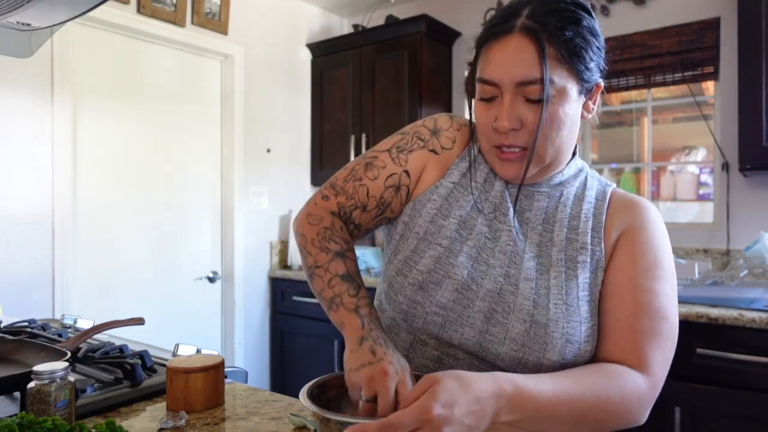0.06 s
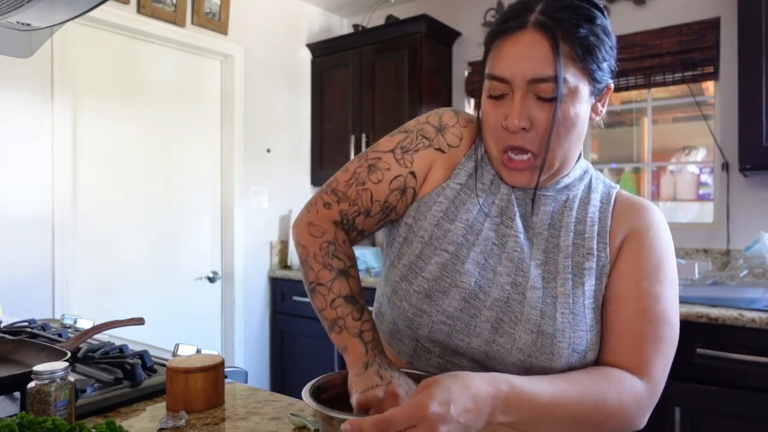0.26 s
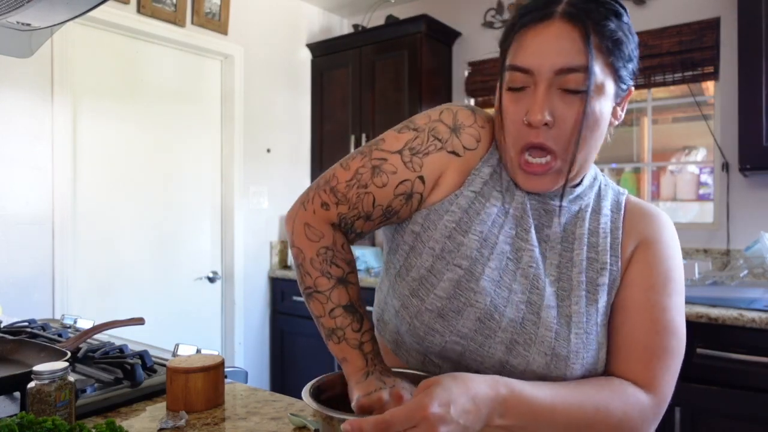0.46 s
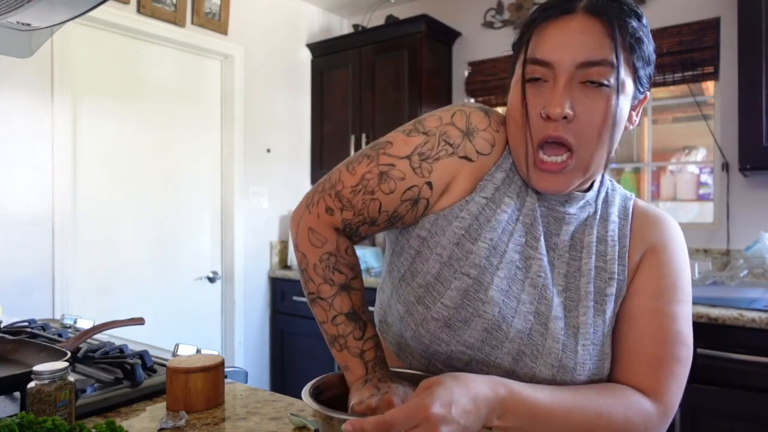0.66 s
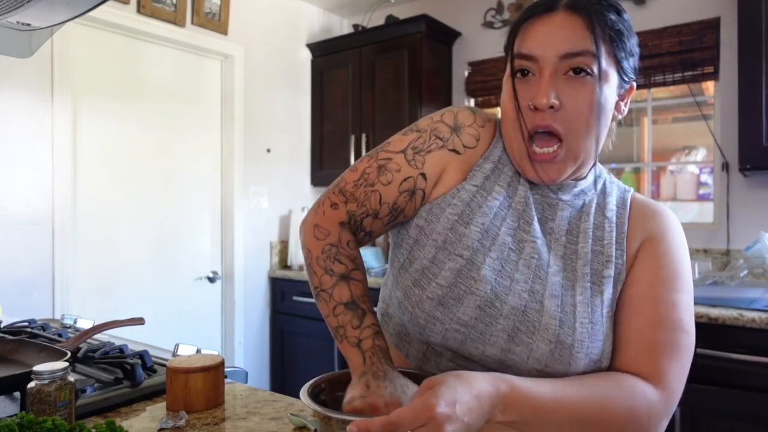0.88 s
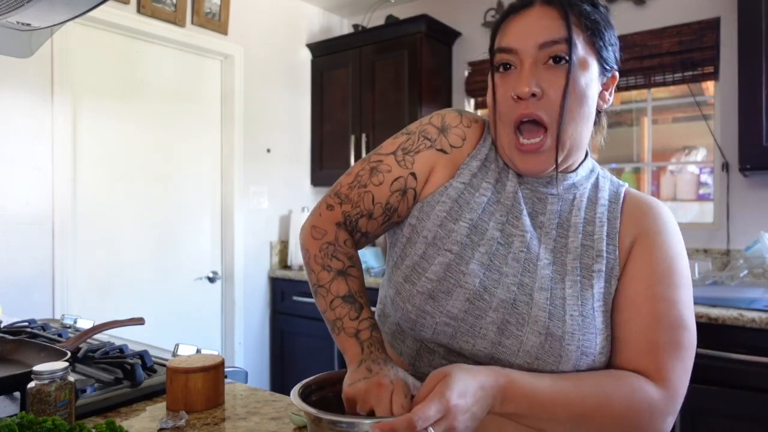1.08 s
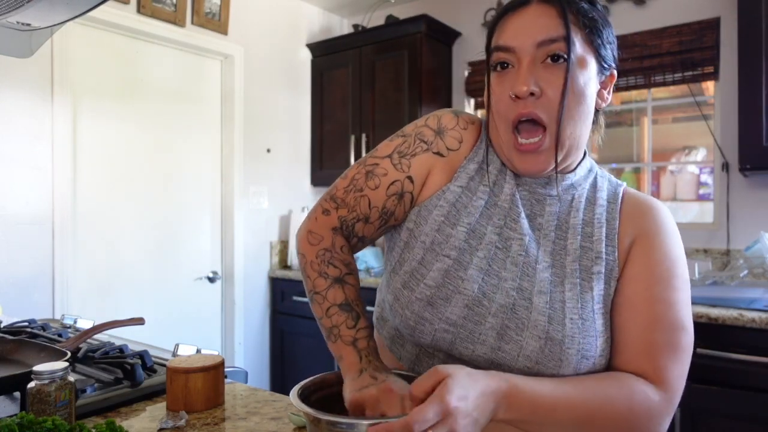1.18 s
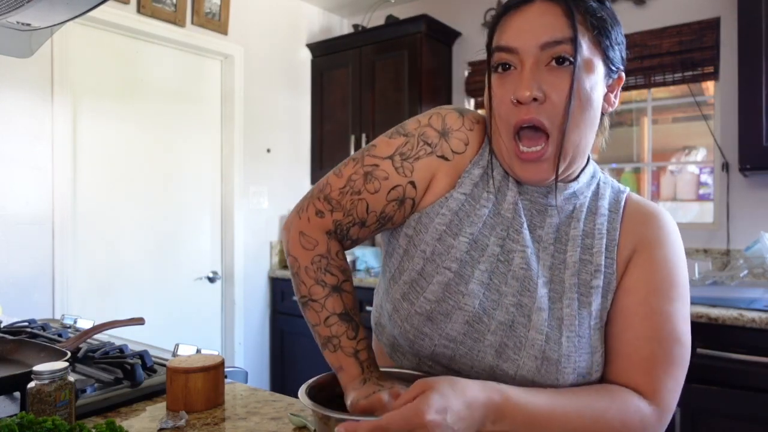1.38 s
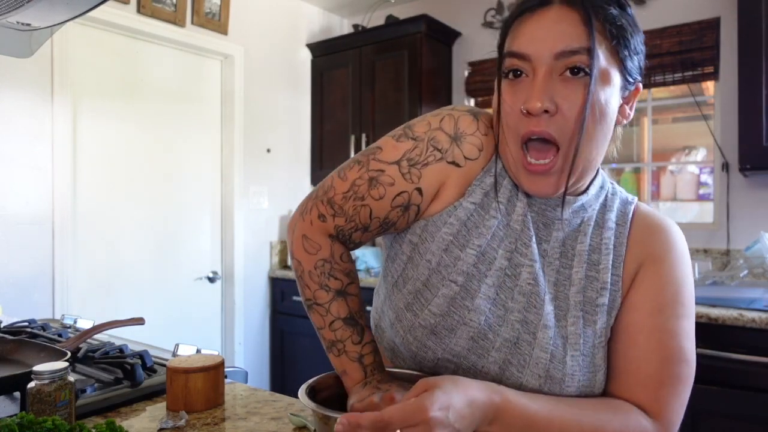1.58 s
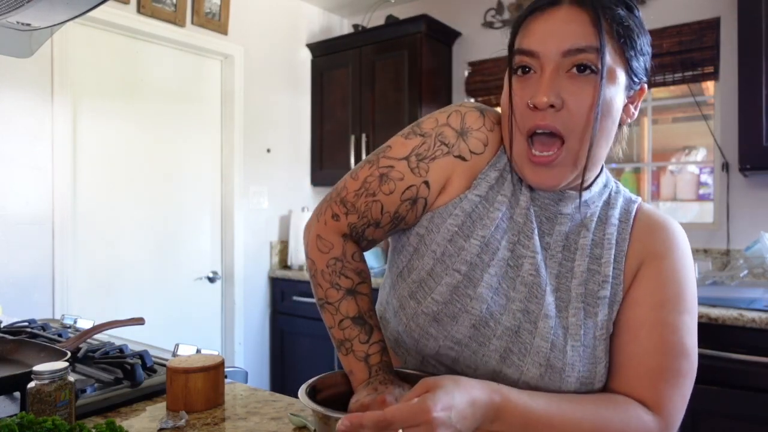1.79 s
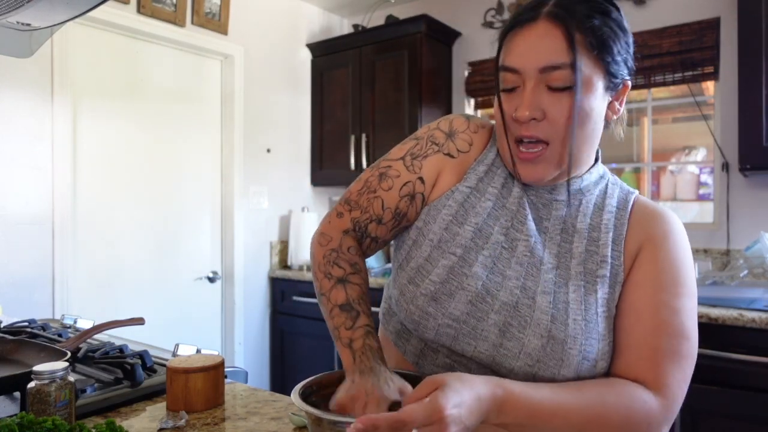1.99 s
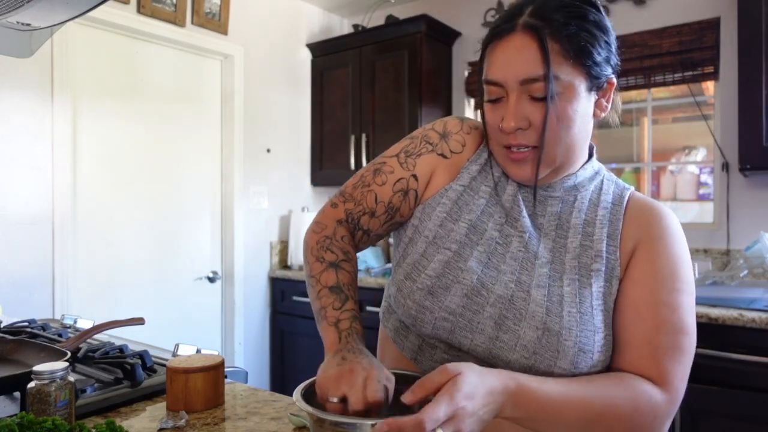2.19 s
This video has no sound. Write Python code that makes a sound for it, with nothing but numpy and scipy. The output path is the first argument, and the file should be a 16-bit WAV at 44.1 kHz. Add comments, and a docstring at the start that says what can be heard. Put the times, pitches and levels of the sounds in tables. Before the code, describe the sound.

Crushing peppercorns with a glass in a steel bowl: a knock and gritty crunch, a dense flurry of sharp cracks, a second duller ringing knock, then one loud crack, close microphone in a lively kitchen.

```python
"""Faint room air comes first, then a glass knocks on a steel bowl on a kitchen counter and crumbs grate.
The glass is pressed and rocked on peppercorns: seeds burst with sharp cracks, made of scattered, resonant clicks.
Knocks are damped sines, the bowl rings in sums of dying modes, and grating is a shower of random tiny clicks.
Filtered noise gives the counter's rumble and the air. The hard room rings after each crack;
the recorder's limiter flattens the cracks, so the ring swells up behind them."""
import sys
import numpy as np
from scipy import signal
from scipy.fft import rfft, irfft
from scipy.io import wavfile
from scipy.ndimage import uniform_filter1d, minimum_filter1d

SR = 44100
rng = np.random.default_rng(int(sys.argv[2]) if len(sys.argv) > 2 else 0)


def bounce(signal):
    """Save signal as a 16-bit WAV file at the path given by the first command-line argument."""
    frames = np.transpose(np.atleast_2d(signal))
    limited = np.clip(frames, -1, 1)
    pcm = np.round(limited * 32767).astype(np.int16)
    wavfile.write(sys.argv[1], SR, pcm)


N = 99225
TIME = np.arange(N) / SR

# All levels are relative and stand before the microphone and limiter.
# still kitchen air, spectrum: freq_hz, gain_db
AIR_SPECTRUM = [(20, -31), (55, -22), (100, 17), (155, 26), (300, 19.5), (600, 7), (1500, -0.5),
                (4000, -10), (9000, -15), (16000, -35)]
AIR_DB, AIR_SIDE_DB = -35, -16.5
# dull rumble of the counter under the pressing hand: time_s, level_db
RUMBLE_LEVEL = [(0, -69), (.19, -28), (.215, -18), (.27, -23), (.36, -32), (.5, -36), (.84, -29),
                (.89, -11), (.97, -30), (1.06, -42), (1.22, -41), (1.245, -35), (1.33, -37), (1.55, -43),
                (1.68, -31.5), (2.25, -66)]
# rumble spectrum: freq_hz, gain_db
RUMBLE_SPECTRUM = [(20, -28), (55, -51), (90, 8.5), (160, 9), (260, -13), (450, -65), (1200, -55)]

# glass striking the bowl: start_s, level_db, pitch_hz, boom_db, clink_db, grit_db (last three re level_db)
GLASS_KNOCKS = [(.1985, 6, 656, -5, -6, -25), (.2135, -3.5, 960, -29, -1, 2.5),
                (.245, -4, 764, -12, -2.5, 0.5), (1.233, -1.5, 700, -1, -11, -10),
                (1.2415, -8.5, 890, 11, -4, 0), (1.2525, -13.5, 585, 24, -24, 3.5),
                (1.271, -19, 605, 23.5, -17, -2), (1.2865, -23, 587, 18.5, 12, -14),
                (1.6245, -18, 440, -33, -16, -11)]
KNOCK_DECAY_S, KNOCK_LOW_CUT_HZ = 0.0014, 160
KNOCK_GRIT_HZ, KNOCK_GRIT_Q, KNOCK_FIZZ_DB = 2090, 1, -19.5
# modes of the bowl's bottom, damped by the counter: freq_hz, level_db, t60_s
BOTTOM_MODES = [(446, -6.5, 0.093), (560, 12, 0.1), (623, 6, 0.071), (713, 0.5, 0.27), (767, -1.5, 0.055),
                (915, -8.5, .08)]
# modes of the bowl's free wall: freq_hz, level_db, t60_s
WALL_MODES = [(723, 6.5, 0.33), (893.5, 0, 0.13), (1584, -10, 0.69), (1816, -3, 0.46), (1952, -2.5, 0.33),
              (2105, -8, 0.35), (2870, -15.5, 0.39), (3760, -28, 0.15), (3990, -8.5, 0.15),
              (5373, -10, 0.22), (6480, -9.5, 0.087), (8250, -14.5, 0.21)]
WALL_SPLIT = 0.014  # nominal spacing of split partners, as a fraction of the mode's frequency

# crumbs grating under the glass: time_s, level_db
GRATING_LEVEL = [(0, -71), (.19, -61), (0.229, -16.5), (.33, -36.5), (.39, -67), (.42, -48), (.48, -49),
                 (.55, -50), (.62, -54), (.72, -30.5), (.82, -40), (.92, -22), (1.03, -37.5), (1.2, -32),
                 (1.26, -20), (1.4, -42), (1.5, -38.5), (1.7, -49), (1.8, -45), (2.03, -44), (2.15, -46.5),
                 (2.25, -55)]
# grating spectrum: freq_hz, gain_db
GRATING_SPECTRUM = [(200, 11), (700, 13), (1900, 13.5), (3800, -3), (7000, -4), (11000, -10.5), (16000, -8)]
GRAINS_PER_S, GRAIN_SPREAD_DB = 3500, 3.5

# seeds bursting: start_s, level_db, pitch_hz, sharpness_q, thud_db, fizz_db (last two re level_db)
SEED_CRACKS = [(0.413, -34, 7950, 0.63, -14, -15), (0.4948, -16, 3400, 1.2, -32, -1),
               (0.5059, 13.5, 4200, 1.8, -9, -9), (.516, -5, 3820, 3.9, -9, -25),
               (.633, -9, 3640, 5.5, -13, -18), (0.644, 2, 3500, 4, -3, -18),
               (0.653, 12, 4380, 2.5, -10, -6), (0.6649, 19, 2987, 10.4, -26, -15),
               (0.699, 6, 3100, 4.7, -30, -22), (0.705, 9.5, 3730, 0.94, -27, -5.5),
               (0.7361, 1, 2430, 3, -29, -36), (.753, 0.5, 3040, 5.3, -35, -10),
               (.794, -19.5, 3070, 6, -38.5, -31), (0.823, -2, 11120, 3.8, -36.5, -5.5),
               (0.8387, -0.5, 3600, 3.9, -14, -16), (0.8456, 19, 2710, 1.75, -26, -15),
               (0.886, 8.5, 3780, 4.1, -26, -43), (0.916, 2.5, 1930, 5.1, -46, -26),
               (.967, 2.5, 1680, 4.1, -22, -38), (1.215, -27, 10500, 1.4, -30, -1),
               (1.321, -18, 2810, 2, 1, -4.5), (1.43, -25.5, 4300, 2.2, 2.5, -32),
               (1.579, -29, 3120, 1.7, 1, -38), (1.6248, -13.5, 2820, 3.5, -1, -31),
               (1.7215, 20, 3060, 0.98, -9.5, -8.5), (1.844, -2, 4450, 2.8, -40, 2),
               (1.8646, -1, 1900, 1.6, -5, -16), (2.109, -33, 9000, 0.69, -10, 5.5)]
FIZZ_HZ, FIZZ_Q, THUD_HZ, THUD_Q = 11000, 1.5, 734, 0.87
SCATTER_MIN_S, SCATTER_MAX_S, SCATTER_ECHO = 0.00012, 0.0009, 0.58  # nominal splinter delays, strength
SNAP_TOP = 1.93  # a snap holds little above this multiple of its pitch
DROP_S = 0.001996  # the glass drops this long after the seed gives way
RING_LOW_HZ, CRACK_RING_DB = 1400, -12.5

# reverberation time of the room: freq_hz, t60_s
ROOM_DECAY = [(100, 0.36), (500, 0.46), (1500, 0.47), (3500, 0.47), (7000, 0.48), (11000, 0.41),
              (16000, 0.28)]
# reflections from near surfaces: delay_s, level_db
NEAR_ECHOES = [(.0063, -3.5), (0.0105, -8), (0.0145, -25.5)]
TAIL_DB, TAIL_BUILD_S, BOWL_ROOM_DB, BOOM_ROOM_DB = -0.5, 0.0041, -1.5, -17.5
SIDE_DB, SIDE_TOP_HZ, BALANCE_DB = -17, 6330, -0.39

# microphone colour: freq_hz, gain_db
MIC_RESPONSE = [(100, -15.5), (300, -10), (650, -5), (1250, -6.5), (1900, -3.5), (2450, -5.5), (3800, -3),
                (4800, -7.5), (6000, -3), (7400, -5.5), (9000, -2), (11300, 0), (13000, -6.5),
                (16000, -6.5)]
CEILING_DB, RECOVER_S, LIMITER_WINDOW = -5, 0.043, 45  # window in samples
LOW_CUT_HZ, CUTOFF_HZ = 64, 16100


def amp(db):
    """Level law: decibels become a gain in amplitude."""
    return 10 ** (np.asarray(db) / 20)


def unit(x):
    """Energy normalisation: the squared samples sum to one."""
    return x / np.sqrt(np.sum(x ** 2) + 1e-20)


def read(points, hz):
    """Interpolation along a logarithmic frequency axis."""
    freq_hz, value = np.transpose(points)
    return np.interp(np.log(hz + 1), np.log(freq_hz + 1), value)


def colour(x, points):
    """Linear filtering: the spectrum is multiplied by a tabulated gain."""
    size = 2 * N
    gain = amp(read(points, np.fft.rfftfreq(size, 1 / SR)))
    return irfft(rfft(x, size) * gain, size)[..., :N]


def butterworth(x, order, hz, kind="low"):
    """Maximally flat filtering: low- or high-pass about a cutoff."""
    return signal.sosfilt(signal.butter(order, hz, kind, fs=SR, output="sos"), x)


def follow(x, curve):
    """Amplitude modulation: a steady sound takes the level of a curve over time."""
    level_db = np.interp(TIME, *np.transpose(curve))
    return unit(x) * np.sqrt(N) * amp(level_db)


def add(mix, start_s, level_db, sound):
    """Superposition of a blow; its level is its energy packed into one millisecond."""
    part = mix[round(start_s * SR):][:len(sound)]
    part += amp(level_db) * np.sqrt(SR / 1000) * sound[:len(part)]


def background():
    """Filtered noise: counter rumble and still air, nearly alike in both ears through a shared component."""
    shared = rng.standard_normal((2, 1, N))
    opposed = rng.standard_normal((2, 1, N)) * [[1], [-1]]
    rumble_noise, air_noise = shared + amp(AIR_SIDE_DB) * opposed
    rumble = follow(colour(rumble_noise, RUMBLE_SPECTRUM), RUMBLE_LEVEL)
    air = amp(AIR_DB) * np.sqrt(N) * unit(colour(air_noise, AIR_SPECTRUM))
    return rumble + air


def ring(modes):
    """Modal decay: a struck part of the bowl rings as a sum of dying sines."""
    t = TIME[:SR]
    total = np.zeros(SR)
    for hz, db, t60 in modes:
        decay = np.exp(-np.log(1000) * t / t60)
        mode = unit(np.sin(2 * np.pi * hz * t) * decay)
        total += amp(db) * rng.choice([-1, 1]) * mode
    return unit(total)


def struck_wall():
    """Broken symmetry: the wall is not quite round, so each mode splits into close, beating partners."""
    modes = []
    for hz, db, t60 in WALL_MODES:
        for partner in (-1, 0, 1):
            offset = partner + rng.uniform(-0.502, 0.542)
            modes.append((hz * (1 + WALL_SPLIT * offset), db, t60))
    return ring(modes)


def burst(hz, q):
    """Brittle fracture: a click, scattered by all-pass echoes, excites one broad resonance."""
    click = signal.unit_impulse(2048)
    delays_s = np.geomspace(SCATTER_MIN_S, SCATTER_MAX_S, 5) * rng.uniform(.8, 1.2, 5)
    for delay_s in delays_s:
        loop = np.r_[1, np.zeros(round(delay_s * SR)), SCATTER_ECHO * rng.choice([-1, 1])]
        click = signal.lfilter(loop[::-1], loop, click)
    # the floor on Q keeps the resonance from becoming too wide for the sample rate
    resonance = signal.iirpeak(min(hz, SR / 3), max(q, hz * 4 / SR), fs=SR)
    return unit(signal.lfilter(*resonance, click))


def snap(hz, q):
    """Band limitation: the body of a fracture is duller the lower it is pitched."""
    return unit(butterworth(burst(hz, q), 2, min(SNAP_TOP * hz, SR / 3)))


def fizz():
    """High-frequency radiation: fine splinters are heard only in the high treble."""
    return unit(butterworth(burst(FIZZ_HZ, FIZZ_Q), 2, FIZZ_HZ / 2, "high"))


def knocks():
    """Impact excitation: glass on steel gives a blunt push, a wall clink and crushed grit; booms are separate."""
    hits, booms, t = np.zeros(N), np.zeros(N), TIME[:SR]
    wall, bottom = struck_wall(), ring(BOTTOM_MODES)
    for start_s, level_db, hz, boom_db, clink_db, grit_db in GLASS_KNOCKS:
        push = unit(np.sin(2 * np.pi * hz * t) * np.exp(-t / KNOCK_DECAY_S))
        add(hits, start_s, level_db, push)
        add(hits, start_s, level_db + clink_db, wall)
        add(hits, start_s, level_db + grit_db, snap(KNOCK_GRIT_HZ, KNOCK_GRIT_Q))
        add(hits, start_s, level_db + KNOCK_FIZZ_DB, fizz())
        booms[round(start_s * SR):] = 0  # each new contact stops the previous boom
        add(booms, start_s, level_db + boom_db, bottom)
    return butterworth([hits, booms], 4, KNOCK_LOW_CUT_HZ, "high")


def grating():
    """Granular friction: many tiny fractures of uneven size sound as the glass turns."""
    size_db = GRAIN_SPREAD_DB * np.minimum(rng.exponential(1, N), 4)
    sizes = amp(size_db) * rng.choice([-1., 1.], N)
    clicks = sizes * (rng.random(N) < GRAINS_PER_S / SR)
    return follow(colour(clicks, GRATING_SPECTRUM), GRATING_LEVEL)


def cracks():
    """Impulsive excitation: each seed snaps, sprays fizz, drops the glass and rings the wall's upper modes."""
    out = np.zeros(N)
    for start_s, level_db, hz, q, thud_db, fizz_db in SEED_CRACKS:
        add(out, start_s, level_db, snap(hz, q) + amp(fizz_db) * fizz())
        add(out, start_s + DROP_S, level_db + thud_db, burst(THUD_HZ, THUD_Q))
    out = butterworth(out, 3, THUD_HZ / 2, "high")
    drive = butterworth(out, 2, RING_LOW_HZ, "high")
    wall_ring = signal.fftconvolve(drive, struck_wall())[:N]
    return out + amp(CRACK_RING_DB) * wall_ring


def room_tail():
    """Diffuse reverberation: in noise, each band dies at its own speed."""
    hz, t, bands = signal.stft(rng.standard_normal(SR), SR, nperseg=256)
    decay = np.exp(-np.log(1000) * t / read(ROOM_DECAY, hz)[:, None])
    tail = signal.istft(bands * decay, SR)[1][:SR]
    build_up = 1 - np.exp(-TIME[:SR] / TAIL_BUILD_S)
    return amp(TAIL_DB) * unit(tail * build_up)


def kitchen(x, room_db):
    """Room impulse response: direct sound, near echoes and tail, with only a little width."""
    mid = amp(room_db) * room_tail()
    mid[0] += 1  # direct sound
    for delay_s, level_db in NEAR_ECHOES:
        mid[round(delay_s * SR)] += amp(level_db)
    side = amp(SIDE_DB + room_db / 2) * butterworth(room_tail(), 4, SIDE_TOP_HZ)
    ears = np.array([mid + side, mid - side])
    return signal.fftconvolve(x[None], ears, axes=1)[:, :N]


def scene():
    """Superposition in the kitchen; the boom comes through the counter with little room."""
    hits, booms = knocks()
    bowl = kitchen(hits + grating() + cracks(), BOWL_ROOM_DB)
    bowl = bowl + kitchen(booms, BOOM_ROOM_DB)
    return (bowl + background()) * amp([[BALANCE_DB], [-BALANCE_DB]])


def record(dry):
    """Gain reduction: after microphone colour, a fast peak limiter recovers smoothly; then the band is limited."""
    x = colour(dry, MIC_RESPONSE)
    peak_db = 20 * np.log10(abs(x).max(0) + 1e-9)
    over_db = np.maximum(peak_db - CEILING_DB, 1e-6)
    held_db = -minimum_filter1d(-over_db, size=LIMITER_WINDOW)
    # the cut in decibels jumps up with a peak, then decays exponentially
    recovery = TIME / RECOVER_S
    cut_db = np.exp(np.maximum.accumulate(np.log(held_db) + recovery) - recovery)
    limited = x * amp(-uniform_filter1d(cut_db, size=LIMITER_WINDOW))
    limited = butterworth(limited, 2, LOW_CUT_HZ, "high")
    top_cut = signal.firwin(401, CUTOFF_HZ, window=("kaiser", 9), fs=SR)
    return signal.oaconvolve(limited, top_cut[None], "same")


dry = scene()
out = record(dry)
bounce(out)
```